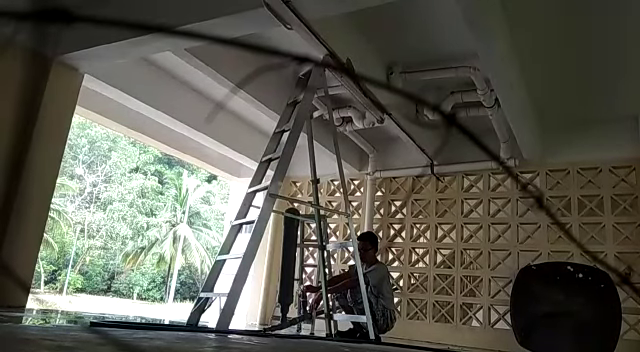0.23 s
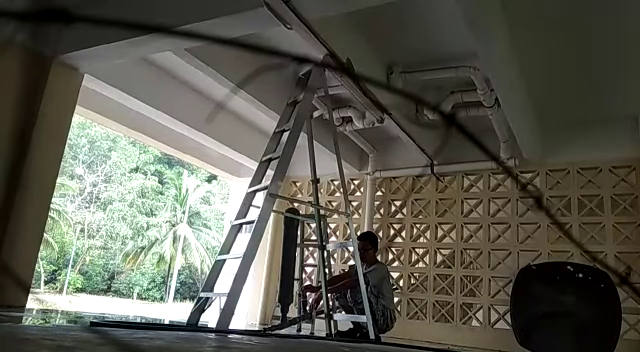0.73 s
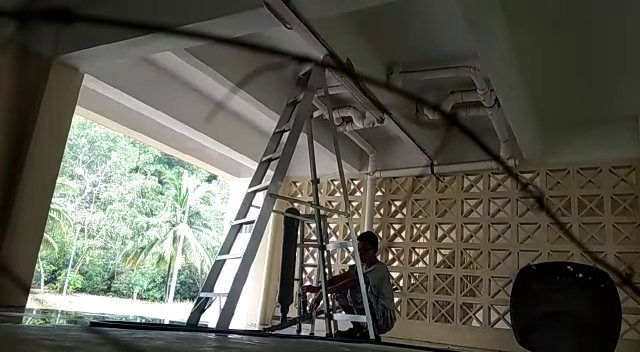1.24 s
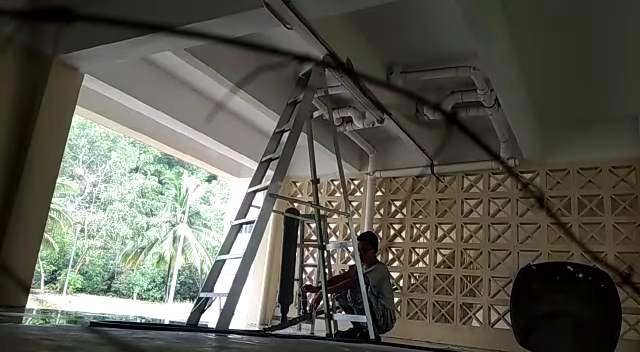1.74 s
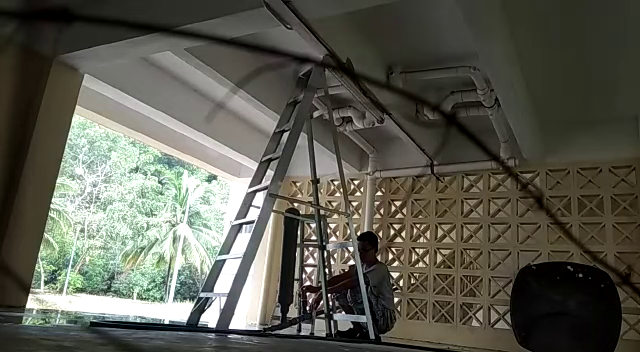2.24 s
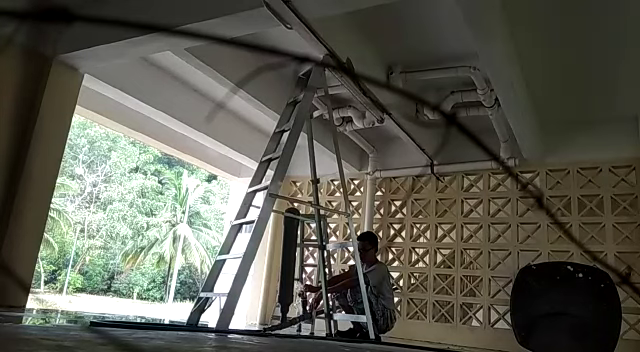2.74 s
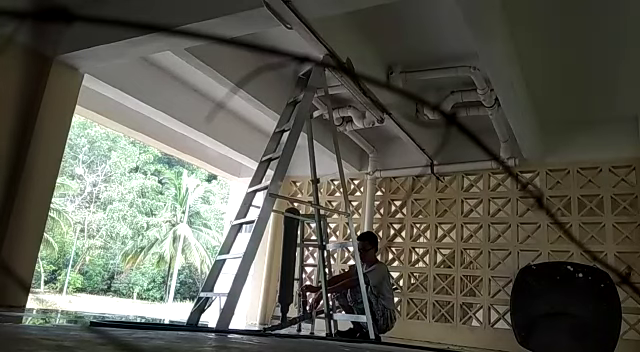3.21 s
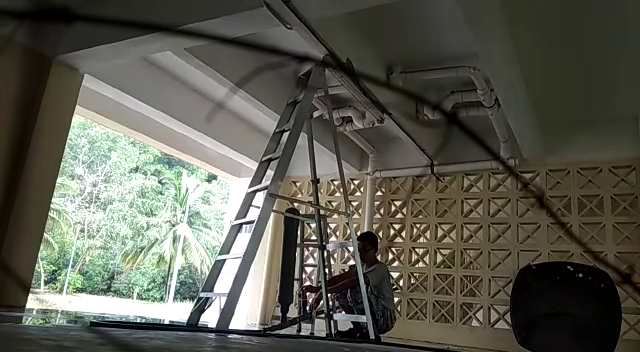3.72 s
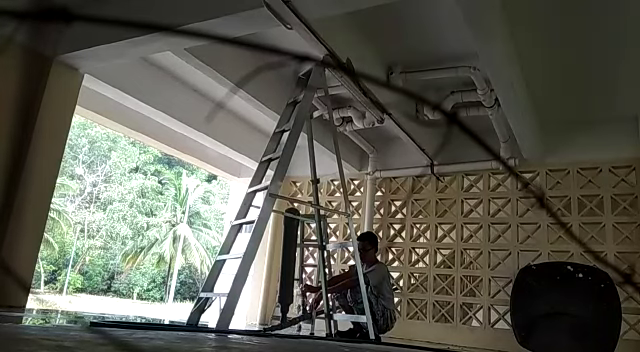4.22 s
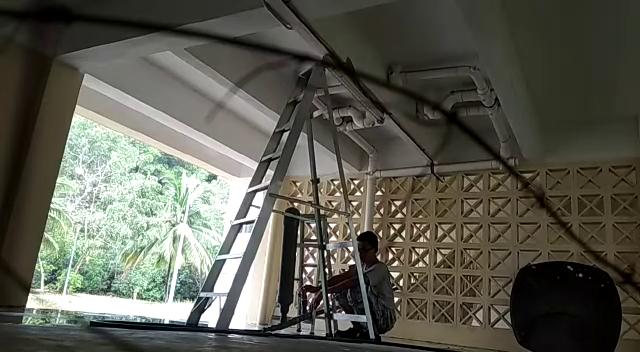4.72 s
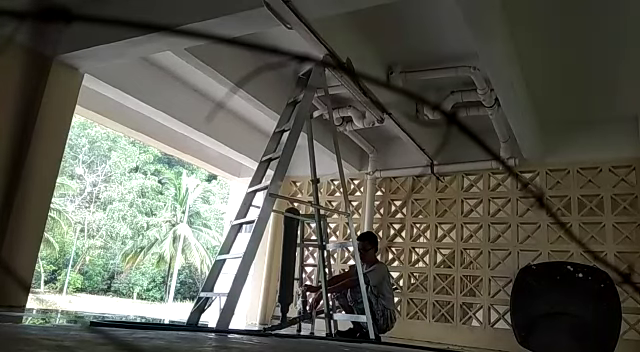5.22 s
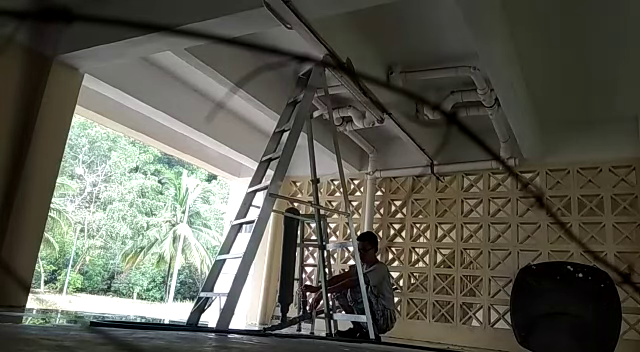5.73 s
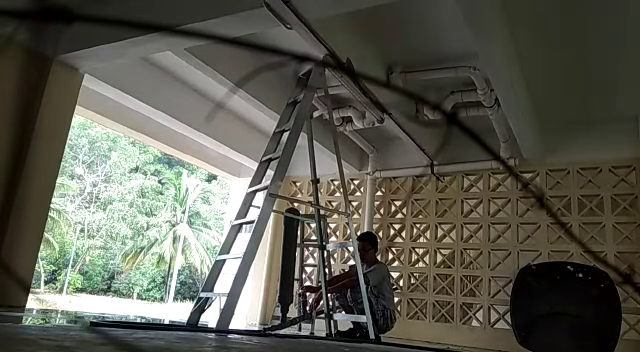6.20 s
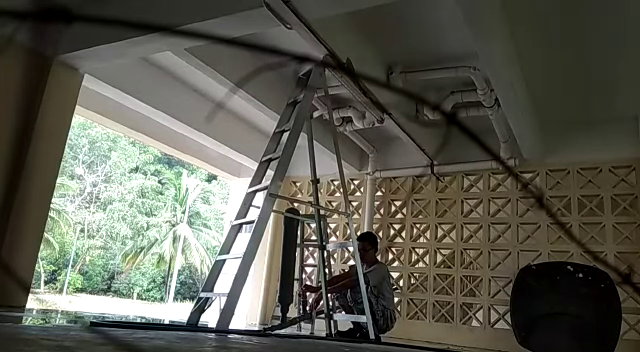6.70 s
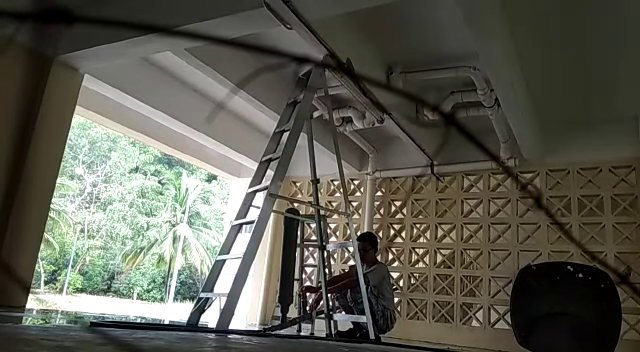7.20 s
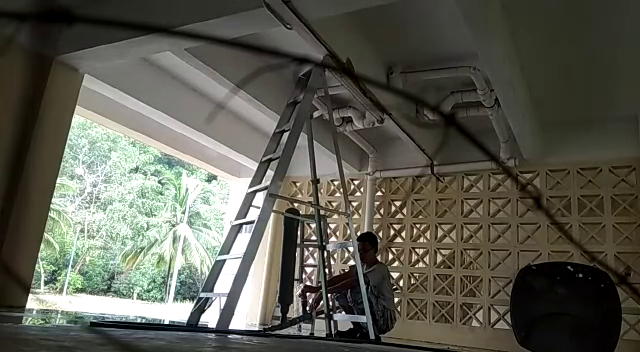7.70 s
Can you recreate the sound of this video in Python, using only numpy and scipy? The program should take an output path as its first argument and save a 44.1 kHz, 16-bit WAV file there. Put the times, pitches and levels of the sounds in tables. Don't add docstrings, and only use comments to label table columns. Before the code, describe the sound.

A water-driven pump valve clacks hard about every 1.3 seconds on an echoing concrete porch, with water spurts, light ticks and wind buffeting the microphone.

```python
import sys
import numpy as np
from scipy import signal
from scipy.fft import rfft, irfft
from scipy.io import wavfile
from scipy.ndimage import uniform_filter1d

SR = 44100
rng = np.random.default_rng(int(sys.argv[2]) if len(sys.argv) > 2 else 0)


def ratio(d):
    e = np.asarray(d, float) / 20
    return 10 ** e


def unload_audio(sound):
    columns = np.transpose(np.atleast_2d(sound))
    steps = np.round(np.clip(columns, -1, 1) * 32767)
    wavfile.write(sys.argv[1], SR, steps.astype(np.int16))


N = 350595
LEAD = SR // 10


def rms_one(x):
    return x / np.sqrt(np.mean(x ** 2) + 1e-20)


def in_time(rows):
    s, *columns = np.transpose(rows)
    return [np.interp(np.arange(N) / SR, s, column) for column in columns]


def at_hz(points, hz):
    table_hz, values = np.array(points)[:, 0], np.array(points)[:, 1]
    return np.interp(np.log(hz), np.log(table_hz), values)


def drift(rate_hz):
    r = np.exp(-2 * np.pi * rate_hz * 40 / SR)
    white = rng.standard_normal(N // 40 + 2002)
    slow = signal.lfilter([1], [1, -2 * r, r * r], white)[2000:]
    return np.interp(np.arange(N) / 40, np.arange(len(slow)), rms_one(slow))


def coloured(size, spectrum, tilt_db=0):
    hz = np.maximum(np.arange(size // 2 + 1) * SR / size, 15)
    shape = ratio(at_hz(spectrum, hz) + tilt_db * np.log2(hz / 3000))
    return rms_one(irfft(rfft(rng.standard_normal(size)) * shape, size))


def resonate(x, modes, scatter_db):
    out = 0
    for k, (hz, width_hz, db) in enumerate(modes):
        r = np.exp(-np.pi * width_hz / SR)
        rung = signal.lfilter([1, 0, -1], [1, -2 * r * np.cos(2 * np.pi * hz / SR), r * r], x) * (1 - r * r)
        out = out + (-1) ** k * ratio(db + scatter_db * rng.standard_normal()) * rung
    return rms_one(out) / np.sqrt(len(x))


def add(track, s, sound):
    i = LEAD + round(s * SR)
    track[i:i + len(sound)] += sound[:len(track) - i]


# pitch in Hz, likeness from -1 to 1.
SIDE_LIKENESS = [(60, 1), (150, 0.97), (380, 0.85), (950, 0.068), (2380, 0.052), (5980, -0.0049),
                 (15000, -0.1)]
# pitch in Hz, left minus right in dB.
LEFT_LEAN = [(60, 3), (160, -1), (300, 0.5), (700, -3), (1250, 0.5), (2400, 3.5), (4400, -1.5), (6000, 7),
             (7500, 6.5), (9000, 10.5), (11000, 11), (13000, 14), (15500, -3)]


def banded(size, envelope):
    out, edges = 0, 40 * 2 ** np.arange(0, 8.8, 1 / 3)
    sides = np.array([[1], [-1]])
    white = rng.standard_normal((2, 2, size))
    for k, (low, high) in enumerate(zip(edges, edges[1:])):
        band = signal.butter(2, [low, high], "band", fs=SR, output="sos")
        mid, side = signal.sosfilt(band, white[k % 2])
        hz = np.sqrt(low * high)
        alike = np.clip(at_hz(SIDE_LIKENESS, hz), -1, 1)
        pair = np.sqrt(1 + alike) * mid + np.sqrt(1 - alike) * side * sides
        out = out + pair * ratio(sides * at_hz(LEFT_LEAN, hz) / 2) * envelope(hz)
    return out


# pitch in Hz, level in dB.
HUM_COLOUR = [(35, -25), (60, 1), (103, 0), (250, -13.5), (968, -19.5), (1440, -29), (2410, -31),
              (2770, -38), (3580, -25.5), (7570, -42), (11800, -36), (14200, -33), (16000, -67)]


def hum():
    pass_s, pass_width_s, pass_db, pass_hz = 7.14, .3, 7.5, 180
    swell_db = pass_db * np.exp(-((np.arange(N) / SR - pass_s) / pass_width_s) ** 2)

    def envelope(hz):
        nearness = np.exp(-np.log2(hz / pass_hz) ** 2)
        return ratio(at_hz(HUM_COLOUR, hz) + 2.19 * drift(2.06) + swell_db * nearness)
    return ratio(-52.5) * rms_one(banded(N, envelope))


def push(width_s):
    t = np.arange(-2048, 2048) / SR
    bump = np.exp(-np.abs(1.61 * t / width_s) ** 1.74)
    return bump - 0.32 * np.exp(-(0.7 * t / width_s) ** 2)


# time in seconds, level in dB, left minus right in dB.
GUSTS_OF_WIND = [(0.0, -48, 12), (0.11, -49, 9), (0.71, -51.5, 11), (1.28, -47.5, 21), (1.35, -36.5, 3.5),
                 (1.83, -53, 6.5), (2.45, -45, 9.5), (2.68, -49, 5.5), (3.85, -60, 5.5), (4.03, -53.5, 18),
                 (4.27, -47, 4.5), (4.91, -48.5, 6.5), (4.98, -60, -10), (5.05, -52, 3), (5.6, -58.5, -4),
                 (6.26, -45, 3), (6.93, -57.5, 10), (7.95, -65, -5)]
# middle in seconds, left peak in dB, right peak in dB, width in seconds.
WIND_THUMPS = [(0.0297, -28, -37, 0.0024), (0.155, -28.5, -52, 0.022), (0.338, -23, -50, 0.0051),
               (0.382, -25.5, -44, 0.0057), (0.5907, -24.5, -49, 0.0026), (0.6108, -24.5, -54, 0.002),
               (1.021, -21.5, -42, 0.0029), (1.0555, -22, -49, 0.005), (1.2216, -17, -44, 0.0032),
               (1.226, -18, -46, 0.0032), (1.2679, -27, -50, 0.0083), (1.285, -24, -52, 0.009),
               (1.302, -26, -47, 0.0025), (1.357, -29, -22.5, 0.0051), (1.5167, -29, -41, 0.0078),
               (1.6008, -27.5, -40, 0.02), (1.62, -48, -28, 0.011), (1.9307, -26, -60, 0.0036),
               (2.119, -27, -36.5, 0.0047), (2.183, -26, -43, 0.0062), (2.2246, -19.5, -54, 0.0038),
               (2.263, -26, -34, 0.0041), (4.639, -21.5, -41, 0.0033), (4.9862, -48, -24, 0.0071),
               (5.117, -50, -28, 0.0061), (5.4199, -27.5, -30, 0.002), (6.1537, -21.5, -31, 0.0068),
               (6.29, -31, -47, 0.0056), (6.4125, -56, -26, 0.01), (6.471, -21, -45, 0.0082)]


def wind():
    rumble = [(15, -25), (35, 7.5), (70, -11), (140, -15.5), (300, -29.5), (900, -67)]   # (Hz, dB)
    db, lean_db = in_time(GUSTS_OF_WIND)
    gust = ratio(db + lean_db * [[.5], [-.5]])
    shared, left, right = [coloured(N, rumble) * ratio(1.5 * drift(19)) for k in range(3)]
    out = gust * ratio(1.5) * (.5 * shared + 0.67 * np.array([left, right]))

    eddies_per_s, over_gust_db, spread_db, eddy_width_s = 9, 13, 3, 0.0055
    born = rng.random((2, N)) < eddies_per_s / SR
    sizes = ratio(over_gust_db + spread_db * rng.standard_normal((2, N)))
    out = out + signal.fftconvolve(born * sizes * gust, push(eddy_width_s)[None], "same", axes=1)

    pushes = np.zeros((2, N + LEAD))
    for s, left_db, right_db, width_s in WIND_THUMPS:
        start_s = s - 2048 / SR
        add(pushes[0], start_s, ratio(left_db - 0.5) * push(width_s))
        add(pushes[1], start_s, ratio(right_db) * push(width_s))
    return out + pushes[:, LEAD:]


RUNOFF_LEVELS = [-51.5, -44.5, -44, -41, -41, -62, -47.5, -47]


def runoff():
    swell_s, full_until_s, swell_db, cut_db_per_s = 0.19, 0.35, 28, 120
    flow = ratio(-65)
    for clack, db in zip(VALVE_CLACKS, RUNOFF_LEVELS):
        t = np.arange(N) / SR - clack[0]
        swelling_db = swell_db * np.maximum(1 - t / swell_s, 0)
        cutting_db = cut_db_per_s * np.maximum(t - full_until_s, 0)
        flow = flow + ratio(db - swelling_db - cutting_db) * (t > 0)
    return flow


# start in seconds, level in dB, rise in seconds, fall in seconds,
# brightness in dB per octave.
WATER_SPURTS = [(-.04, -48, 0.0061, 0.029, 0), (.608, -56.5, 0.0042, 0.018, 3),
                (1.79, -46.5, 0.012, 0.02, 3.5), (3.091, -43.5, 0.00045, 0.014, 0.5),
                (3.715, -65, 0.0024, 0.0064, 2), (4.485, -44, 0.0038, 0.034, 0.5),
                (4.88, -73, 0.006, 0.015, 0), (5.192, -66, 0.0036, 0.0033, 0.5),
                (5.62, -49.5, 0.0032, 0.026, 9), (5.69, -47, 0.0037, 0.011, -0.5),
                (6.226, -57, 0.0025, 0.016, 5), (6.259, -55.5, 0.0043, 0.026, 4.5),
                (6.292, -58, 0.0082, 0.014, 6), (6.69, -49, 0.006, 0.024, 4),
                (6.745, -46.5, 0.012, 0.029, 3)]
# pitch in Hz, level in dB per Hz.
SPRAY_COLOUR = [(120, -9), (200, 0), (432, -2.5), (491, -2.5), (1140, -1), (1420, -11), (2210, -5),
                (11700, -10), (16000, -13.5)]


def spurts():
    out, t = np.zeros(N + LEAD), np.arange(16384) / SR
    clack_times = [clack[0] for clack in VALVE_CLACKS]
    for s, db, rise_s, fall_s, tilt_db in WATER_SPURTS:
        last = max(np.searchsorted(clack_times, s) - 1, 0)
        hollow_db = -36 + 0.97 * AIR_COLUMN[last][2]
        drops = ratio(5.4 * np.repeat(rng.standard_normal(64), 256))
        swell_and_fade = (1 - np.exp(-t / rise_s)) * np.exp(-(t / (1.36 * fall_s)) ** 2)
        jet = coloured(16384, SPRAY_COLOUR, tilt_db) * drops * swell_and_fade
        column = resonate(jet, [(1020, 250, 0), (680, 200, -2)], scatter_db=0)
        add(out, s, ratio(db) * (rms_one(jet) / np.sqrt(len(t)) + ratio(hollow_db) * column))
    add(out, 0, runoff() * ratio(-47.0 + 1.35 * drift(4.3)) * coloured(N, SPRAY_COLOUR))
    return out


# delay in seconds, left level in dB, right level in dB.
WALL_ECHOES = [(.0009, 2, 4.5), (.0027, 6, 6.5), (.0045, 2, -10), (.0087, 5.5, -3), (0.0104, 0, 4),
               (0.012, 6, 7.5), (.019, -2, -10)]
# pitch in Hz, seconds to fade by 60 dB.
PORCH_FADE = [(150, 0.61), (400, 1.14), (1000, 1.415), (2800, 0.94), (7000, 0.9), (15000, 0.55)]


def porch(x):
    t = np.arange(round(1.3 * SR)) / SR
    early = 0
    for s, left_db, right_db in WALL_ECHOES:
        early = early + ratio([[left_db], [right_db]]) * np.exp(-np.abs(t - s) / .001) * (t >= s - .0008)
    grow = 1 - np.exp(-t / 0.0094)

    def envelope(hz):
        fall_db = -60 * t / at_hz(PORCH_FADE, hz)
        echoes = early * ratio(1.6 * np.log2(hz / 10000))
        return echoes + grow * (ratio(fall_db) + ratio(1.9 * fall_db - 14.0))
    shade = signal.butter(2, [400, 3500], "band", fs=SR, output="sos")
    arrival = np.eye(1, len(t), round(.0012 * SR))[0] + 1e-18
    direct = ratio(24) * signal.sosfilt(shade, arrival)
    return signal.fftconvolve(x[None], banded(len(t), envelope) + direct, axes=1)[:, LEAD:LEAD + N]


def struck(level_db):
    cepstrum = irfft(level_db * np.log(10) / 20)
    half = len(cepstrum) // 2
    cepstrum[1:half] *= 2
    cepstrum[half + 1:] = 0
    pulse = irfft(np.exp(rfft(cepstrum)))
    return rms_one(pulse) / np.sqrt(len(pulse))


# start in seconds, peak in dB, then thud, body and seat in dB.
VALVE_CLACKS = [
    (0.302, -30, 1.5, -1, 1),
    (1.4752, -23.5, 1, -5.5, 1.5),
    (2.755, -23.5, 2, 1, 1.5),
    (4.1587, -22.5, 0, -4.5, 1),
    (5.3484, -23, 0.5, 2, -1.5),
    (5.9805, -30, 4, -4.5, -0.5),
    (6.426, -23.5, 1, -4.5, 0.5),
    (7.7007, -22.5, 4, 0.5, 0),
]
# pitch in Hz, level in dB per Hz.
KNOCK_COLOUR = [(90, -38), (150, -0.5), (230, -1), (300, -2.5), (410, -9.5), (700, -2.5), (900, -8.5),
                (1350, -8.5), (2000, -6), (3500, -8.5), (5000, -11), (8000, -16.5), (12000, -12),
                (16000, -12)]
# pitch in Hz, width in Hz, dB over the knock.
AIR_COLUMN = [(1250, 240, 18), (1120, 180, 6.5), (1140, 87, 2.5), (964, 310, 5.5), (1118, 125, 19),
              (1090, 175, 13.5), (980, 140, 3.5), (1180, 89, 11.5)]
RINGING_PARTS = [1884, 3470, 6400, 10500]
# pitch factor, then a level in dB for each part.
PART_STRIKES = [(1.12, 2.5, 0.15, 3.4, 7), (0.992, 9, 5.2, .1, 2), (0.97, 4, 4.1, 1.2, 4.5),
                (1.013, 1, 4.5, 1.7, 5), (0.817, 3, 7, 0.91, 4), (0.924, -1, 3.5, 1.5, 2.3),
                (1.067, 6.5, 0.11, .5, 3.5), (0.98, 0.5, .1, 6.2, 13)]
# pitch in Hz, level in dB.
BOUNCE_GAPS = [(1360, -1.5), (2830, -6.5), (4500, -2.5), (5300, -3.5), (8400, -2)]
GAP_SHIFTS = [.99, 0.975, 0.85, 1.005, 1.055, .96, 0.965, 0.927]


def clacks():
    part_width, gap_width = .065, .05
    out, hz = np.zeros(N + LEAD), np.maximum(np.arange(2049) * SR / 4096, 30)
    beats = zip(VALVE_CLACKS, AIR_COLUMN, PART_STRIKES, GAP_SHIFTS)
    for (s, db, thud_db, body_db, seat_db), (air_hz, air_width_hz, air_db), (tune, *pings), shift in beats:
        blow = [(450, thud_db), (2300, body_db), (5000, 0.034), (12000, seat_db)]
        level_db = at_hz(KNOCK_COLOUR, hz) + at_hz(blow, hz)
        level_db = level_db + air_db / (1 + ((hz - air_hz) / air_width_hz) ** 2)
        peaks = [(tune * part_hz, part_db, part_width) for part_hz, part_db in zip(RINGING_PARTS, pings)]
        dips = [(shift * gap_hz, gap_db, gap_width) for gap_hz, gap_db in BOUNCE_GAPS]
        for top_hz, top_db, width in peaks + dips:
            level_db = level_db + top_db * np.exp(-((hz - top_hz) / (width * top_hz)) ** 2)
        add(out, s, ratio(db - 12.5) * struck(level_db))
    return out


# start in seconds, peak in dB, low part in dB, high part in dB.
VALVE_TICKS = [
    (1.2142, -65, 10, -3.5),
    (2.5474, -65.5, 6, -16),
    (2.572, -59, 3.5, -20),
    (3.8877, -54, 1.5, -4),
    (3.997, -63.5, 7, -25),
    (5.1021, -48.5, -2.5, -38),
    (5.1224, -55, -5, -27),
    (5.154, -71, -2, -2),
    (7.4531, -49, -1, -45),
    (7.5622, -71, -3, -14),
]
# pitch in Hz, width in Hz, level in dB.
STEM_MIDDLE = [(3940, 170, 0), (3680, 260, -6), (4280, 260, -7)]
STEM_BOTTOM = [(1000, 220, 1), (1660, 390, -4), (2240, 1250, -10)]
STEM_TOP = [(5500, 810, 5), (7000, 1800, 8)]


def ticks():
    out = np.zeros(N + LEAD)
    soften = signal.butter(4, 7500, fs=SR, output="sos")
    click = signal.sosfilt(soften, np.eye(1, 4096)[0] + 1e-18)
    for s, db, low_db, high_db in VALVE_TICKS:
        for modes, part_db in [(STEM_MIDDLE, 0), (STEM_BOTTOM, low_db), (STEM_TOP, high_db)]:
            add(out, s, ratio(db + part_db - 9) * resonate(click, modes, scatter_db=2))
    return out


# time in seconds, pitch in Hz, level in dB.
BIRD_CALL = [
    (3.54, 2800, -92),
    (3.575, 2660, -84),
    (3.595, 2590, -72),
    (3.62, 2580, -68),
    (3.65, 2600, -75),
    (3.72, 2620, -82),
]


def bird():
    hz, db = in_time(BIRD_CALL)
    t = np.arange(N) / SR
    on = np.clip(np.minimum(t - BIRD_CALL[0][0], BIRD_CALL[-1][0] - t) / .015, 0, 1)
    return np.sqrt(2) * ratio(db + 3.4 * drift(23)) * on * np.sin(2 * np.pi * np.cumsum(hz) / SR)


# pitch in Hz, limit in dB.
FAINT_LIMIT = [(2400, -4.5), (2800, -3.4), (3500, -4), (4300, -2.8), (5400, -2.5), (6300, -3.6),
               (8000, -2.8), (10500, -4.5), (14000, -2.6)]


def thinned(x):
    hz, _, cells = signal.stft(x, SR, nperseg=1024)
    power = (np.abs(cells) ** 2).mean(axis=0)
    power = uniform_filter1d(uniform_filter1d(power, size=2, axis=0), size=5, axis=1)
    db = 10 * np.log10(power + 1e-20)
    under_db = db - uniform_filter1d(db, size=25, axis=0)
    quiet = (under_db < at_hz(FAINT_LIMIT, hz + 1)[:, None]) & (hz[:, None] > 2400)
    quiet = uniform_filter1d(uniform_filter1d(quiet * 1., size=3, axis=1), size=2, axis=0) > .3
    return signal.istft(cells * np.where(quiet, .03, 1), SR, nperseg=1024)[1][:, :N]


def scene():
    pump = clacks() + spurts() + ticks()
    return porch(pump) + hum() + bird() + wind()


def band_limit(x):
    return signal.sosfilt(signal.butter(12, 15900, fs=SR, output="sos"), x)


def record(dry):
    mix = thinned(dry)
    return band_limit(mix)


dry = scene()
out = record(dry)
unload_audio(out)
```